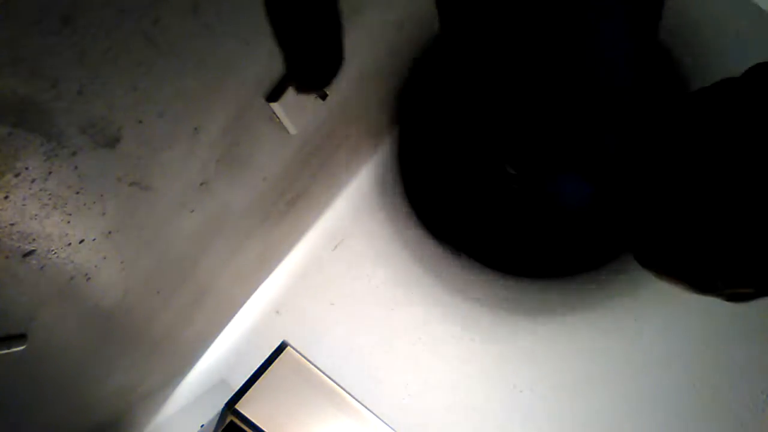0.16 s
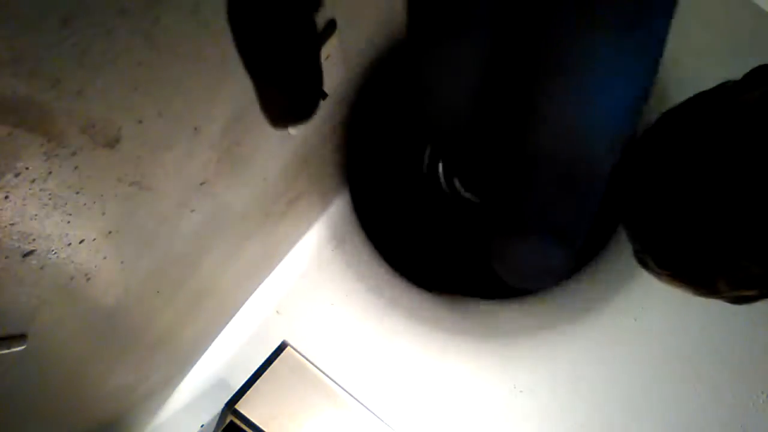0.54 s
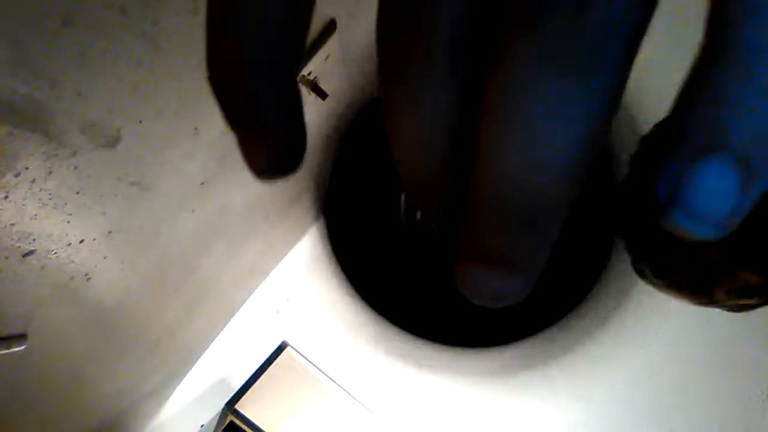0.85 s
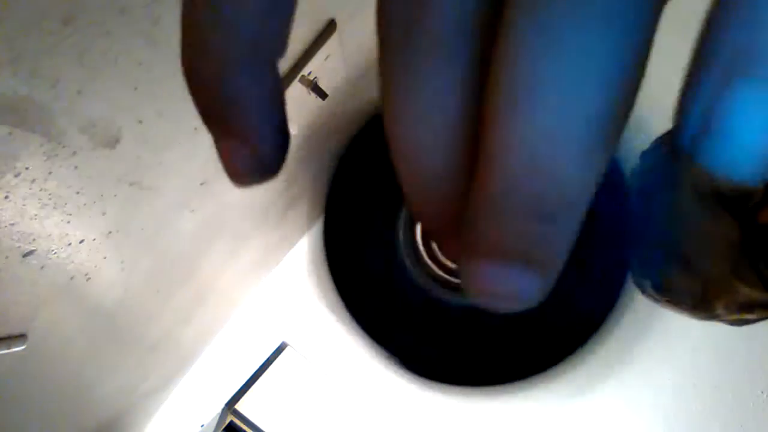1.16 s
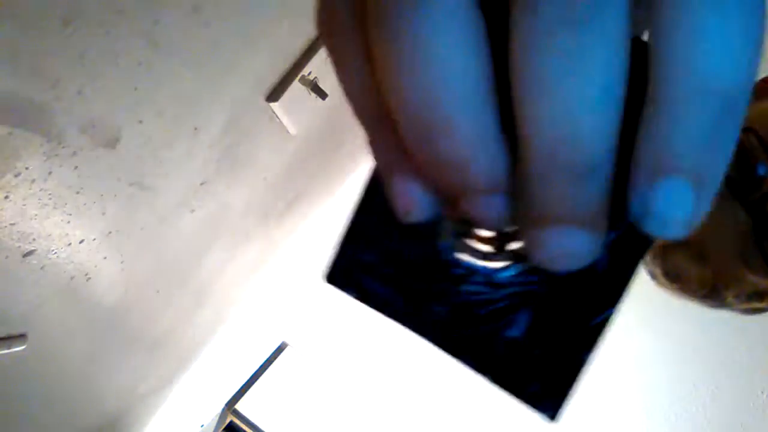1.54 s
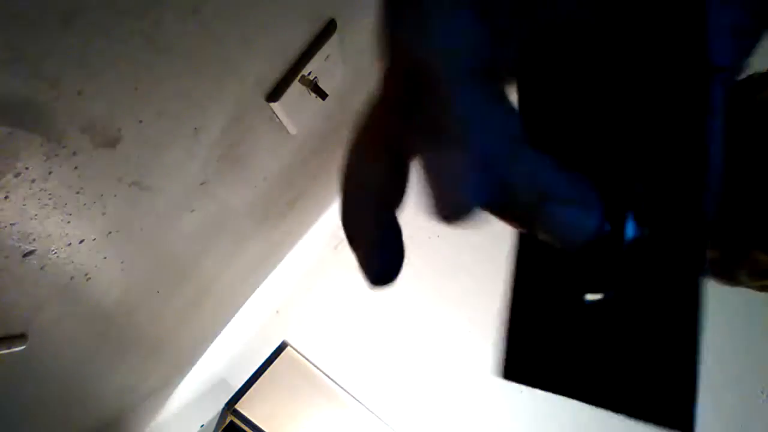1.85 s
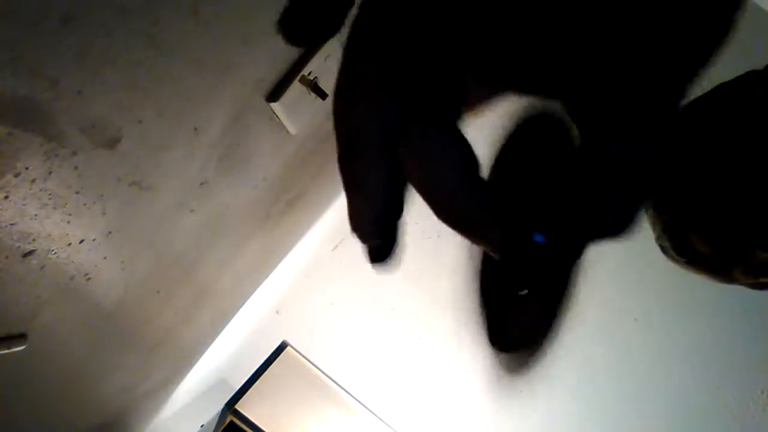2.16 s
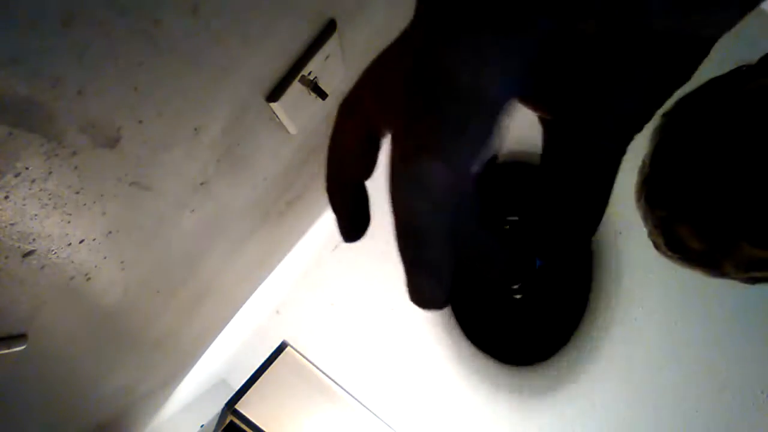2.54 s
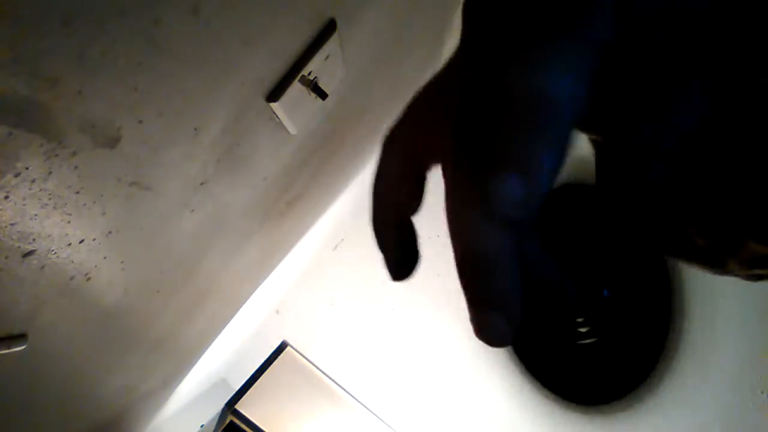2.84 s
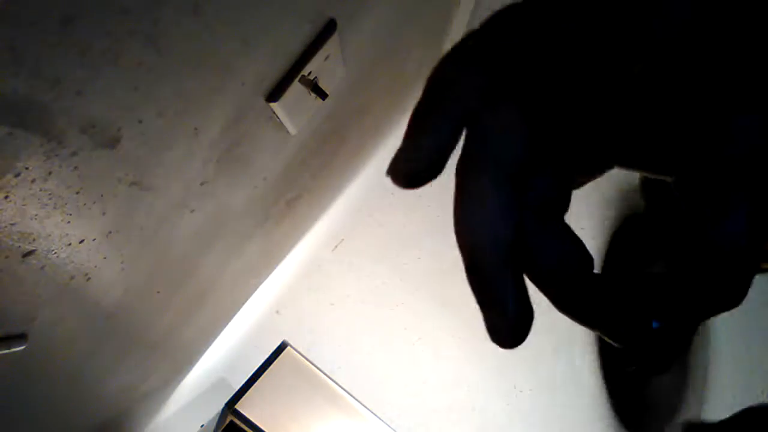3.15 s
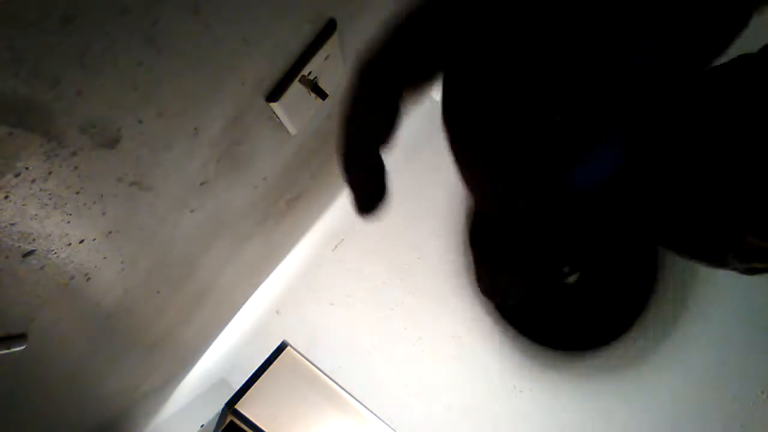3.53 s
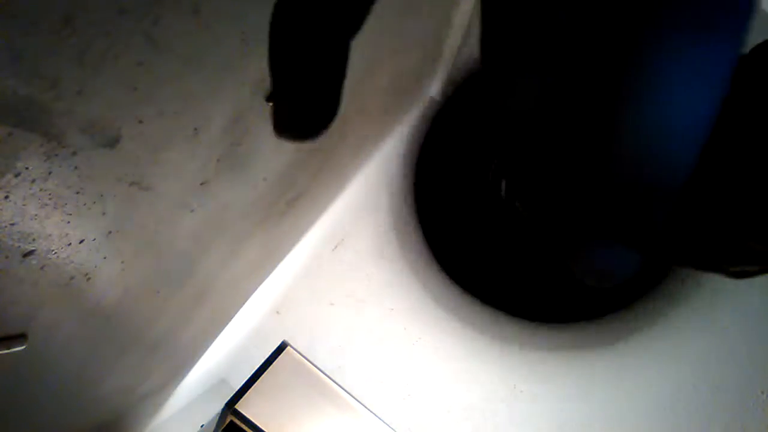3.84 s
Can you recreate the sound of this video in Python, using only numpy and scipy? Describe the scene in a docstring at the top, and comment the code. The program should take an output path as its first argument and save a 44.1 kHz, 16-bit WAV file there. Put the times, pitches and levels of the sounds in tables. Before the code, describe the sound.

Close fluttering whir of a finger spinner, halted with dull knocks, then restarted by clicking flicks.

```python
"""A hand spinner whirs close by in a small room, is stopped by the fingers, then flicked three times.
Its dry bearing is a source of friction noise, filtered by resonances that swell and glide once a turn
as each spin slows. Flicks and dull knocks are sums of damped modes with a noise tail; a diffuse decay
adds the room. Soft handling noise, faint tones and a quiet wavering hum lie beneath."""
import sys
import numpy as np
from scipy import signal
from scipy.fft import rfft, irfft
from scipy.io import wavfile
from scipy.ndimage import uniform_filter1d, map_coordinates

SR = 44100
rng = np.random.default_rng(int(sys.argv[2]) if len(sys.argv) > 2 else 0)


def inscribe(sig):
    """Save sig as 16-bit PCM at rate SR to the path in sys.argv[1].

    A 1-D sig is mono; a 2-D sig holds one channel per row.
    Samples are clipped to [-1, 1] before scaling.
    """
    pcm = np.round(np.clip(np.atleast_2d(sig).T, -1, 1) * 32767)
    wavfile.write(sys.argv[1], SR, pcm.astype(np.int16))


N = 176400

# spins: (start t/s, end t/s, t/s of one swell, turns per s at that swell, slowing/turns per s per s)
SPINS = [(-.02, 1.5, .046, 16.15, 2.9), (2.165, 2.48, 2.204, 15.6, 2.0), (2.48, 3.337, 2.542, 16.3, 4.6),
         (3.337, 4.1, 3.416, 17.0, 3.2)]
# tone of each spin: (ring f/Hz, rasp f/Hz, buzz level/dB, buzz f/Hz, fizz level/dB)
SPIN_TONES = [(5990, 2540, -1, 3260, -1.5), (5920, 2486, 3, 3150, -2), (5970, 2490, 1, 3290, -4),
              (6106, 2530, 1, 3270, -1.2)]
# strength of the bearing friction in the upper resonances: (t/s, level/dB)
FRICTION_LEVEL = [(0, 2), (.27, 0.5), (.55, -0.5), (1.0, -1), (1.4, -1.5), (1.49, -0.5), (2.17, -2),
                  (2.44, -2), (2.54, 0), (2.8, 0.5), (3.08, -1.5), (3.28, -3.5), (3.42, -0.5), (3.75, -0.5),
                  (4, -1.5)]
STOP_S = 0.0092  # rise and fall time of a spin
GRAINS_PER_S, GRAIN_SPREAD_DB = 2600, 2.5
SMOOTH_SHARE, COMMON_SHARE = 0.52, 0.43  # power shares: smooth hiss, noise common to both sides
LEFT_LAG_S = 0.00015

# ring near 6 kHz: (width/Hz, left level/dB, right level/dB)
RING = (850, -58.5, -47.5)
# gain of the ring: (t/s, level/dB)
RING_LEVEL = [(0, -0.5), (.25, 1), (.5, 1), (.9, 0.5), (1.45, 0.5), (2.2, 0.5), (2.9, 1.5), (3.07, 4),
              (3.17, -1.5), (3.26, -6), (3.41, 3), (3.55, 6), (3.8, 2.5), (4, 4)]
# depth of the once-a-turn swell of the ring: (t/s, level/dB)
SWELL_DEPTH = [(0, 2.5), (.25, 2.5), (.5, 3), (1.4, 3.5), (2.2, 1), (2.45, -0.5), (2.6, 3), (2.8, 5),
               (3.05, 7.5), (3.3, 0.5), (3.41, 4.5), (3.55, 6.5), (3.7, 5), (4, 1.5)]
SWELL_SHARP, TURN_SCATTER_DB = 0.3, 0.64  # share of the second harmonic; slow random level
RING_BEND, RASP_BEND = 0.0305, 0.025  # pitch glide as a share of the pitch
# rasp near 2.5 kHz: (width/Hz, left level/dB, right level/dB)
RASP = (387, -61, -55.5)
# gain of the rasp, which thins as the spinner tilts: (t/s, level/dB)
RASP_LEVEL = [(0, 0), (.5, -1.5), (1.45, 0.5), (2.17, 5.5), (2.45, 2.5), (2.6, -4.5), (2.95, -4.5),
              (3.25, -7), (3.42, -4.5), (3.7, -0.5), (4, -0.5)]
# the rasp rises as the spinner tilts: (t/s, pitch factor)
RASP_GLIDE = [(1.5, 1), (2.2, .98), (2.45, 1.014), (2.75, 1.01), (3.0, 1.004), (3.28, 1.12), (3.4, 0.97)]
RASP_SWELL_DB, RASP_LAG_TURNS = 2.5, 0.944
# buzz near 3.2 kHz: (width/Hz, left level/dB, right level/dB)
BUZZ = (470, -59.7, -54)
BUZZ_SWELL_DB, BUZZ_LAG_TURNS = 1, 0.93
# whirr resonances: (f/Hz, width/Hz, left level/dB, right level/dB)
WHIRR = [(4130, 730, -58, -57.5), (4595, 610, -52.5, -51.5)]
# gain of the whirr, which rises as the spinner tilts: (t/s, level/dB)
WHIRR_LEVEL = [(0, 1), (.4, 2.5), (1.45, 2.5), (2.17, -3.5), (2.45, -3.5), (2.6, -1), (2.95, -0.2),
               (3.1, 2.5), (3.25, -4), (3.4, -3), (3.6, -3.5), (4, 0.5)]
WHIRR_SWELL_DB, WHIRR_LAG_TURNS = 2.5, 0.89
# broad hiss resonances: (f/Hz, width/Hz, left level/dB, right level/dB)
HISS = [(5030, 490, -55, -53.5), (7420, 1740, -57, -55.5)]
# gain of the hiss: (t/s, level/dB)
HISS_LEVEL = [(0, 0.5), (.3, 3), (1.0, -0.5), (1.48, 0.5), (2.17, -20), (2.6, -6), (3.25, -4.5),
              (3.45, -5.5), (3.75, 0.5), (4, 0)]
HISS_SWELL_DB, HISS_LAG_TURNS = 1.4, 0.34
SWEEP, SWEEP_LAG_TURNS = 0.0278, 0.047  # once-a-turn pitch glide of hiss and whirr, as a share
WANDER, WANDER_PER_S = 0.022, 130  # random pitch share, and its new values per second
# steady top resonances, the fizz: (f/Hz, width/Hz, left level/dB, right level/dB)
FIZZ = [(6790, 790, -57, -63.5), (8760, 3240, -63.5, -59), (10384, 1560, -55, -57.5),
        (11730, 2200, -68, -67), (13430, 2100, -78, -73)]
# low rattle resonances: (f/Hz, width/Hz, left level/dB, right level/dB)
RATTLE = [(898.4, 120, -73, -61), (1337, 34, -76.5, -74.5), (1692, 144, -68, -66.5), (2106, 235, -67, -63)]
# gain of the rattle, strongest while the spinner lies flat: (t/s, level/dB)
RATTLE_LEVEL = [(0, -7), (.17, 1.5), (.9, 0), (1.48, 2), (2.17, -11), (2.5, -15), (2.7, -7), (3.2, -22.5),
                (3.5, -13), (3.62, -7), (3.72, -4), (3.87, 1.5), (4, -0.5)]
RATTLE_SWELL_DB, RATTLE_LAG_TURNS = 2, 0.61
RATTLE_TOP_POWER = 1.23  # the upper rattle fades faster than its lowest resonance
# low rub in the spinning body: (f/Hz, width/Hz, left level/dB, right level/dB)
RUB = (512, 240, -82, -69)
# gain of the rub: (t/s, level/dB)
RUB_LEVEL = [(0, -2.5), (.6, -2), (.87, 1.5), (1.45, 2.5), (2.2, -5.5), (2.6, -5), (2.8, 0.5), (3.1, -2),
             (3.3, -8.5), (3.5, -15), (4, -6)]
RUB_SWELL_DB = 2.5
# narrow resonance that sinks out of the ring as the slowing spinner tilts: (t/s, f/Hz, level/dB)
TILT = [(2.95, 5660, -72), (3.08, 5330, -57), (3.16, 4850, -54), (3.22, 4520, -53), (3.27, 4380, -53),
        (3.33, 4340, -54), (3.36, 4328, -83)]
TILT_WIDTH_HZ, TILT_PAN_DB = 680, 3

# clacks of finger on spinner and of play in its bearing:
# (t/s, level/dB, low modes level/dB, top modes level/dB, pitch factor, right-left level/dB)
CLACKS = [(1.488, -38.5, 2.5, 9, 0.94, 6.5), (2.1631, -31, 2, -12, 1, 6), (2.1652, -46, -6, -8, 0.97, 0),
          (2.4785, -35, 5.5, -8, 1.03, 8), (2.4808, -37, 4, 6, 0.91, 2), (2.4853, -41, 2, 0, 1.2, 2),
          (2.4922, -34.5, -6, -4, 1.06, 2), (2.545, -36, -17, -10, 1.2, 5), (3.066, -43, -37, -10, 1, 6),
          (3.3366, -31, 3, -2, 1.01, -3), (3.3380, -34.5, -3, 3, 0.687, 5), (3.3429, -40, 0, 11, 0.92, 1),
          (3.3505, -41.5, 5.5, 9, 0.93, -4), (3.3628, -41, -1, 2, 1, 4), (3.418, -33, -33, -10, 1.15, 1),
          (3.426, -36, -30, -10, 1.15, 2), (3.528, -36.5, -41, -10, 1.12, 3)]
# modes of the clacks before the pitch factors: (f/Hz, level/dB, t60/s)
CLACK_MODES = [(318, -20, 0.056), (541, -20, 0.13), (689, -25, 0.1), (1021, -15, 0.033), (1650, -33, 0.038),
               (1845, -18.5, 0.028), (2400, -7, 0.017), (2840, -1, 0.017), (3600, -4, 0.0092),
               (4500, -10, 0.005), (5280, -1.5, 0.0072), (6200, -5.5, 0.0058), (10500, -9, 0.0066),
               (12660, -10.5, 0.011)]
# spectrum of the clack tail: (f/Hz, level/dB)
CLACK_TAIL = [(40, -32), (70, -0.5), (250, -0.5), (520, -0.5), (1100, -6), (1500, -9.5), (2800, -3),
              (6000, -9.5), (9000, -12.5), (13000, -10.5), (16000, -21)]
CLACK_TAIL_DB, CLACK_TAIL_T60_S, CLACK_BODY_HZ = -11.5, 0.15, 800
# dull knocks: (t/s, level/dB, tilt of the upper modes/dB per octave, pitch factor, tail level/dB)
KNOCKS = [(1.0643, -32.5, 1, 0.99, -8), (1.0862, -41, -8, 0.98, -3), (1.0975, -42, -4, 1, -14),
          (1.6104, -40, -15, 1.36, -17.5), (1.778, -62.5, -9, 1.36, -4.5)]
# modes of the knocks before the pitch factor: (f/Hz, level/dB, t60/s)
KNOCK_MODES = [(225, -5.5, 0.13), (295, 0.5, 0.08), (335, -11, 0.065), (419, -11.5, 0.12),
               (494, -6.5, 0.071), (608, -9.5, 0.068), (1011, -5.5, 0.075), (1427, -19, 0.087),
               (1934, -17, 0.11)]
# spectrum of the knock tail: (f/Hz, level/dB)
KNOCK_TAIL = [(50, -19), (160, -7.5), (240, 1), (500, 2.5), (750, -3.5), (1050, -7.5), (1350, -13.5),
              (2200, -11), (3000, -20), (4000, -36), (12000, -55)]
KNOCK_T60_S, KNOCK_TILT_HZ = 0.31, 398  # decay of the tail; modes above this f are tilted

# fingers brush the stopped spinner: (t/s, half length/s, level/dB)
BRUSHES = [(1.638, 0.013, -58), (1.646, 0.058, -73.5), (1.77, .12, -77.5)]
# spectrum of the brushes: (f/Hz, level/dB)
BRUSH_COLOUR = [(710, -40), (1200, -24), (1460, -34), (1910, -10), (2130, -9.5), (3110, -5), (3790, -11),
                (6510, -8.5), (16000, -21.5)]
# muffled bumps of the hand: (t/s, half length/s, level/dB)
BUMPS = [(1.645, 0.029, -63), (1.78, 0.018, -71)]
# spectrum of the bumps: (f/Hz, level/dB)
BUMP_COLOUR = [(30, -27), (65, 5), (100, 3), (170, -9), (400, -34), (2000, -60)]
# soft handling noise: (t/s, level/dB)
HANDLING_LEVEL = [(0, -70.5), (.7, -70.5), (.87, -63), (1.0, -74), (1.3, -65.5), (1.65, -60.5), (1.85, -72),
                  (2.0, -74), (2.65, -76.5), (2.85, -69), (3.2, -68.5), (3.5, -77.5), (4, -69.5)]
# spectrum of the handling noise: (f/Hz, level/dB)
HANDLING_COLOUR = [(100, -7.5), (220, -4), (300, 1), (440, 2), (540, -2), (680, -20), (1500, -17),
                   (5000, -28.5)]
HANDLING_PAN_DB = 3  # weaker on the left by this much

ROOM_DB, ROOM_T60_S = -12, 0.29
# spectrum of the room noise: (f/Hz, level/dB)
FLOOR_COLOUR = [(15, -50), (33, -34), (56, -8), (75, 0.5), (97, -14), (122, -1), (150, -4), (190, -7),
                (240, -5.5), (450, -27), (760, -22.5), (1020, -18), (1400, -23.5), (2500, -25.5),
                (12500, -32.5), (16000, -62)]
FLOOR_DB = -72.5
# hum: (f/Hz, level/dB)
HUM = [(59, -80.5), (145, -74.5)]
HUM_WAVER_DB, HUM_WAVER_RAD = 1.8, 0.8
# faint low tones that come and go: (t/s, half length/s, f/Hz, level/dB)
TONES = [(3.782, .017, 480, -57.5), (3.83, .04, 474, -67), (3.985, .018, 476, -57.5), (2.14, .05, 333, -69),
         (2.26, .04, 345, -71), (3.22, .04, 290, -69)]
TOP_HZ = 15800


def spinner():
    """Forced resonance: bearing friction drives filters modulated once a turn, under uniform slowing."""
    t, noise, out = clock(), friction(), 0
    lowest_rattle = resonate(noise, *RATTLE[0])
    upper_rattle, whirr, hiss, fizz = (
        sum(resonate(noise, *row) for row in table) for table in (RATTLE[1:], WHIRR, HISS, FIZZ))
    rattle_gain = curve(RATTLE_LEVEL)
    rattle = lowest_rattle * rattle_gain + upper_rattle * rattle_gain ** RATTLE_TOP_POWER
    hiss, whirr = hiss * curve(HISS_LEVEL), whirr * curve(WHIRR_LEVEL)
    rub = resonate(noise, *RUB) * curve(RUB_LEVEL)
    rasp_glide = np.interp(t, *np.array(RASP_GLIDE).T) - 1
    strength, depth, rasp_gain = curve(FRICTION_LEVEL), curve(SWELL_DEPTH), curve(RASP_LEVEL)
    # a deeper swell is turned down a little
    ring_gain = curve(RING_LEVEL) * undb(TURN_SCATTER_DB * walk(18)) / np.sqrt(depth)

    for spin, tone in zip(SPINS, SPIN_TONES):
        start, end, at, rate, slowing = spin
        ring_hz, rasp_hz, buzz_db, buzz_hz, fizz_db = tone
        turns = rate * (t - at) - slowing * (t - at) ** 2 / 2

        def swell(lag):
            """Periodic modulation: one cosine cycle a turn, delayed by a share of a turn."""
            return np.cos(2 * np.pi * (turns - lag))

        gate = np.clip((t - start) / STOP_S, 0, 1) * np.clip((end - t) / STOP_S + 1, 0, 1)
        pulse = depth ** (swell(0) + SWELL_SHARP * np.cos(2 * np.pi * 2 * turns))
        ring = waver(resonate(noise, ring_hz, *RING), RING_BEND * swell(0)) * pulse * ring_gain
        swish = hiss * undb(HISS_SWELL_DB * swell(HISS_LAG_TURNS))
        swish = swish + whirr * undb(WHIRR_SWELL_DB * swell(WHIRR_LAG_TURNS))
        swish = waver(swish, SWEEP * swell(SWEEP_LAG_TURNS))
        buzz = resonate(noise, buzz_hz, *BUZZ) * undb(buzz_db + BUZZ_SWELL_DB * swell(BUZZ_LAG_TURNS))
        rasp_bend = rasp_glide + RASP_BEND * swell(RASP_LAG_TURNS)
        rasp = waver(resonate(noise, rasp_hz, *RASP, order=3), rasp_bend)
        rasp = rasp * rasp_gain * undb(RASP_SWELL_DB * swell(RASP_LAG_TURNS))
        treble = ring + swish + fizz * undb(fizz_db) + buzz + rasp
        low = rattle * undb(RATTLE_SWELL_DB * swell(RATTLE_LAG_TURNS))
        low = low + rub * undb(RUB_SWELL_DB * swell(RATTLE_LAG_TURNS))
        out = out + gate * (strength * treble + low)
    return out


def friction():
    """Shot noise: dense tiny impacts of the bearing balls over a smooth rolling hiss."""
    sizes = undb(GRAIN_SPREAD_DB * np.minimum(rng.exponential(size=N), 4))
    ticks = unit((rng.random(N) < GRAINS_PER_S / SR) * sizes) * rng.choice([-1, 1], (3, N))
    smooth = rng.standard_normal((3, N))
    noise = np.sqrt(1 - SMOOTH_SHARE) * ticks + np.sqrt(SMOOTH_SHARE) * smooth
    # third row is common to both sides
    return lagged(np.sqrt(COMMON_SHARE) * noise[2] + np.sqrt(1 - COMMON_SHARE) * noise[:2])


def tilt_resonance():
    """Gliding resonance: bearing friction rings a narrow band that sinks as the spinner tilts."""
    t = clock()
    at, hz, db = np.array(TILT).T
    ring = resonate(friction(), hz[-1], TILT_WIDTH_HZ, TILT_PAN_DB, -TILT_PAN_DB)
    ring = waver(ring, np.interp(t, at, hz) / hz[-1] - 1, wander=.012)
    return ring * undb(np.interp(t, at, db)) * (t > at[0]) * (t < at[-1])


def clacks():
    """Impulse response: contacts excite damped modes; a short scatter from nearby surfaces follows."""
    direct, tail_power = 0, 0
    for at, db, low_db, top_db, pitch, pan_db in CLACKS:
        modes = []
        for hz, mode_db, t60 in CLACK_MODES:
            level = mode_db + low_db * (hz < 2000) + top_db * (hz > 8000)
            # only the modes above the body range change with the point of contact
            modes.append((hz * (pitch if hz > CLACK_BODY_HZ else 1), level, t60))
        sides = undb([[db - pan_db / 2], [db + pan_db / 2]])
        direct = direct + sides * strike(at, modes, 0.98, attack=0.00014)
        tail = undb(db + low_db / 2) * fade(at, CLACK_TAIL_T60_S, attack=0.00067)
        tail_power = tail_power + tail ** 2
    return lagged(direct) + undb(CLACK_TAIL_DB) * np.sqrt(tail_power) * coloured(CLACK_TAIL)


def knocks():
    """Modal excitation: soft bumps ring a hollow body and boom briefly in the room."""
    direct, tail_power = 0, 0
    for at, db, upper_db, pitch, tail_db in KNOCKS:
        modes = [(hz, mode_db + upper_db * max(np.log2(hz / KNOCK_TILT_HZ), 0), t60)
                 for hz, mode_db, t60 in KNOCK_MODES]
        direct = direct + undb(db) * strike(at, modes, pitch, attack=0.00039)
        tail = undb(db + tail_db) * fade(at, KNOCK_T60_S, attack=0.0018)
        tail_power = tail_power + tail ** 2
    return lagged(direct * undb([[-.5], [.5]])) + np.sqrt(tail_power) * coloured(KNOCK_TAIL)


def hands():
    """Contact noise: skin brushes and bumps the stopped spinner, and the grip rustles softly."""
    def touch(rows):
        """Superposition of smooth touches."""
        return sum(undb(db) * bump(at, half) for at, half, db in rows)

    grip = coloured(HANDLING_COLOUR) * curve(HANDLING_LEVEL) * undb([[-HANDLING_PAN_DB], [0]])
    return coloured(BRUSH_COLOUR) * touch(BRUSHES) + coloured(BUMP_COLOUR) * touch(BUMPS) + grip


def room(x):
    """Diffuse reverberation: convolution with decaying noise, independent on each side."""
    age = np.arange(SR // 2) / SR
    decay = np.exp(-np.log(1000) * age / ROOM_T60_S) * (age > .004)
    tail = rng.standard_normal((2, len(age))) * decay
    return x + undb(ROOM_DB) * signal.fftconvolve(x, unit(tail) / np.sqrt(len(age)), axes=1)[:, :N]


def background():
    """Stationary noise with a hum wavering in phase and level, and faint passing tones."""
    t, hum = clock(), 0
    for hz, db in HUM:
        wave = np.sin(2 * np.pi * hz * t + HUM_WAVER_RAD * walk(7.4))
        hum = hum + undb(db) * unit(wave * undb(HUM_WAVER_DB * walk(7.86)))
    tones = sum(undb(db) * bump(at, half) * np.sin(2 * np.pi * hz * t) for at, half, hz, db in TONES)
    return undb(FLOOR_DB) * coloured(FLOOR_COLOUR) + hum + tones


def resonate(x, hz, width, left_db, right_db, order=2):
    """Band-pass resonance: steep, with its own level on each side."""
    edges = np.clip([hz - width / 2, hz + width / 2], 20, .48 * SR)
    band = signal.butter(order, edges, "bandpass", fs=SR, output="sos")
    return unit(signal.sosfilt(band, x)) * undb([[left_db], [right_db]])


def waver(x, bend, wander=WANDER):
    """Frequency modulation by variable reading speed: a pitch bend plus a quick random wander."""
    place = np.arange(N) + np.cumsum(bend + wander * walk(WANDER_PER_S))
    return np.array([map_coordinates(side, [place], mode="mirror") for side in x])


def strike(at, modes, pitch, attack):
    """Free vibration: damped modes (f/Hz, level/dB, t60/s) set off at one moment."""
    age = np.arange(SR // 3) / SR
    ring = 0
    for k, (hz, db, t60) in enumerate(modes):
        wave = np.sin(2 * np.pi * hz * pitch * age)
        ring = ring + (-1) ** k * undb(db) * wave * np.exp(-np.log(1000) * age / t60)
    return np.pad(ring * (1 - np.exp(-age / attack)), (int(at * SR), N))[:N]


def fade(at, t60, attack):
    """Exponential decay: a short rise, then a fall of 60 dB per t60."""
    age = np.maximum(clock() - at, 0)
    return (1 - np.exp(-age / attack)) * np.exp(-np.minimum(np.log(1000) * age / t60, 50))


def bump(at, half):
    """Gaussian envelope: a smooth rise and fall."""
    return np.exp(-((clock() - at) / half) ** 2 / 2)


def coloured(points):
    """Spectral shaping of stereo noise, more alike on both sides in the bass."""
    f = np.arange(N // 2 + 1) * SR / N + 1
    hz, db = np.array(points).T
    mid, side = rfft(rng.standard_normal((2, N)))
    side = side * np.minimum(0.29 + f / 1400, 1)
    shape = undb(np.interp(np.log(f), np.log(hz), db))
    return unit(irfft(np.array([mid + side, mid - side]) * shape, N))


def lagged(x):
    """Interaural delay as linear phase: the sound reaches the left a little later."""
    f = np.arange(N // 2 + 1) * SR / N
    return np.array([irfft(rfft(x[0]) * np.exp(-2j * np.pi * f * LEFT_LAG_S), N), x[1]])


def walk(rate):
    """Low-passed chance: smoothed random steps, rate per second, with an RMS of 1."""
    k = int(SR / rate)
    steps = np.repeat(rng.standard_normal(size=4000)[:N // k + 1], k)[:N]
    return unit(uniform_filter1d(steps, k))


def curve(rows):
    """Gain over time, interpolated linearly in decibels from (t/s, level/dB)."""
    return undb(np.interp(clock(), *np.array(rows).T))


def clock():
    """Sampling instants in seconds."""
    return np.arange(N) / SR


def undb(db):
    """Amplitude ratio of a level in decibels."""
    return 10 ** (np.asarray(db) / 20)


def unit(x):
    """Normalisation to an RMS of 1."""
    return x / np.sqrt(np.mean(x ** 2) + 1e-20)


def scene():
    """Superposition: spinner and blows excite the room; hands and background are added dry."""
    return room(spinner() + tilt_resonance() + clacks() + knocks()) + hands() + background()


def record(dry):
    """Band limitation: the recorder cuts the deepest bass and the top."""
    dry = signal.sosfilt(signal.butter(4, 42, "highpass", fs=SR, output="sos"), dry)
    return signal.sosfilt(signal.ellip(8, .2, 70, TOP_HZ, fs=SR, output="sos"), dry)


dry = scene()
out = record(dry)
inscribe(out)
```